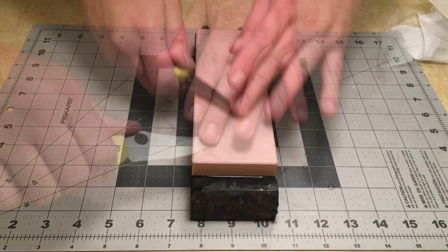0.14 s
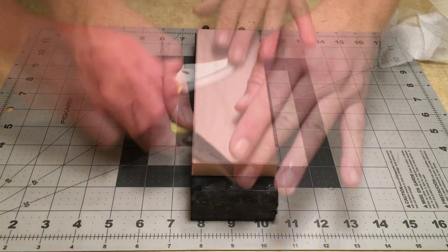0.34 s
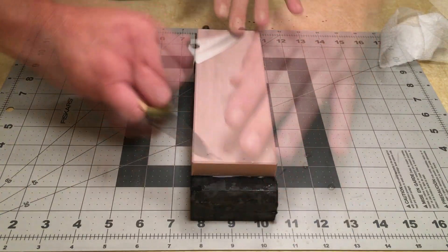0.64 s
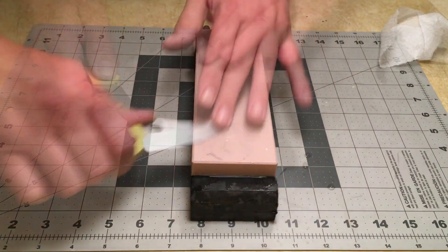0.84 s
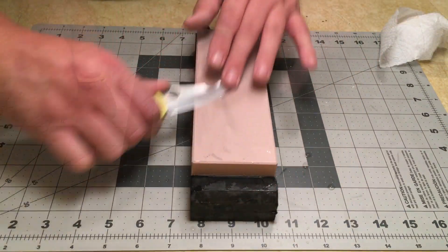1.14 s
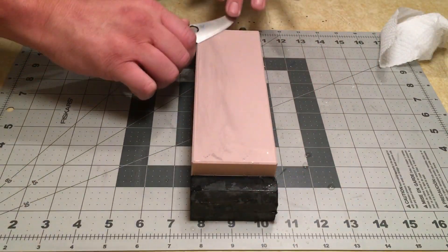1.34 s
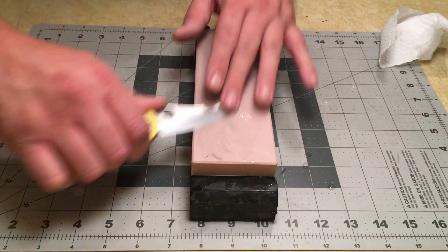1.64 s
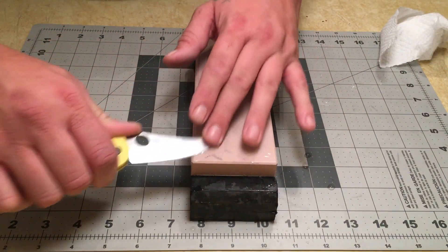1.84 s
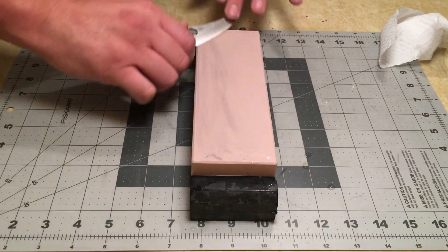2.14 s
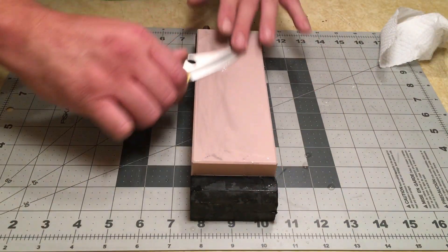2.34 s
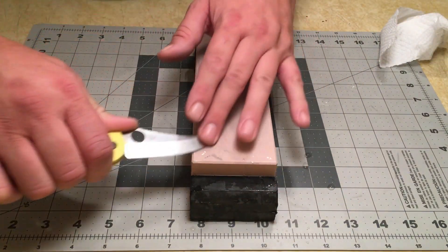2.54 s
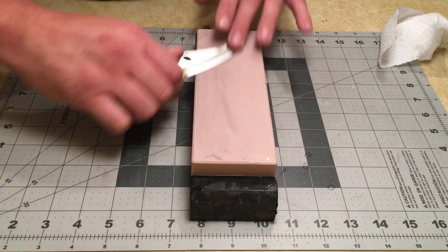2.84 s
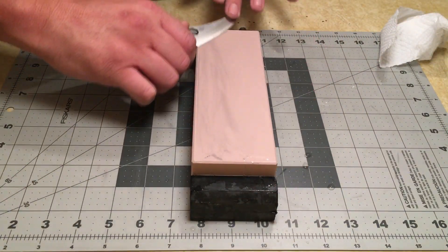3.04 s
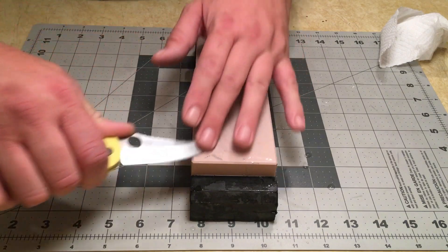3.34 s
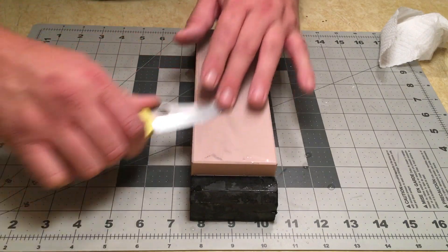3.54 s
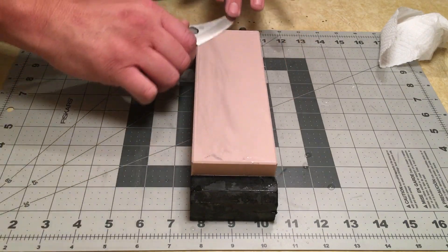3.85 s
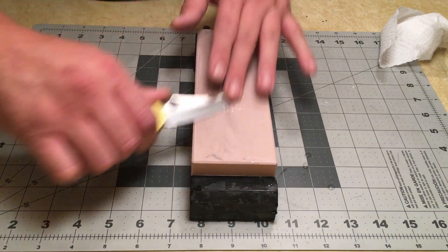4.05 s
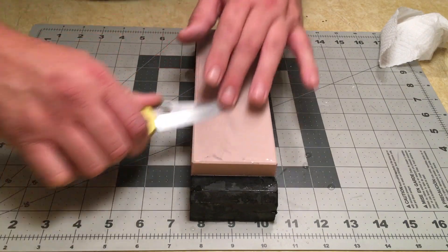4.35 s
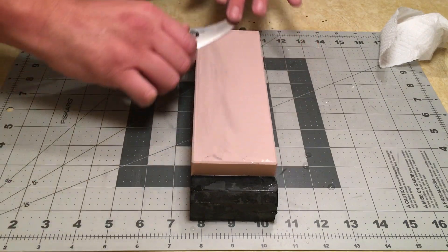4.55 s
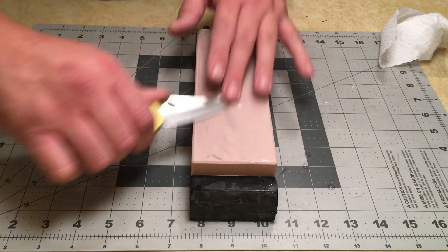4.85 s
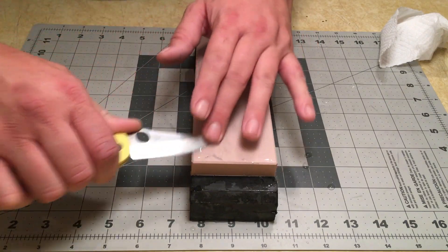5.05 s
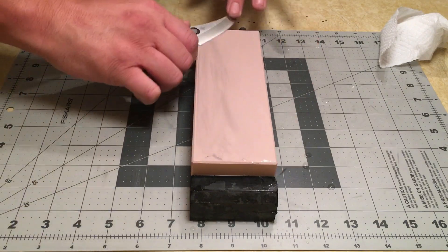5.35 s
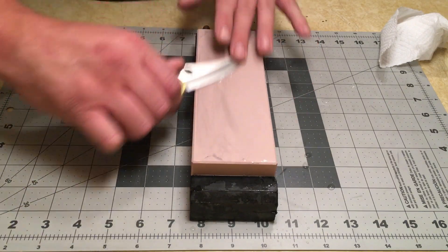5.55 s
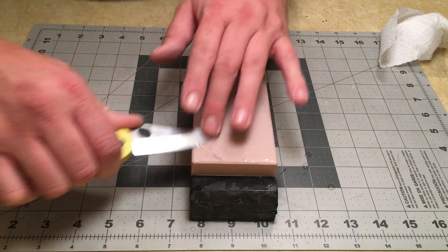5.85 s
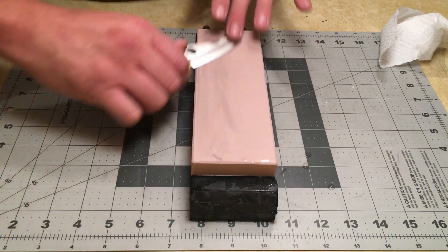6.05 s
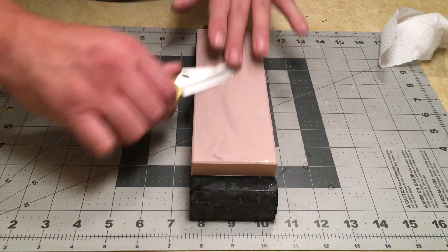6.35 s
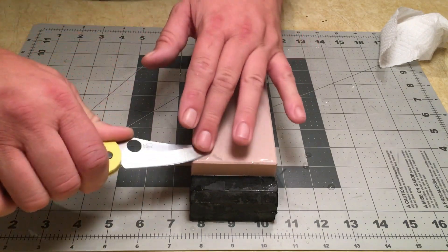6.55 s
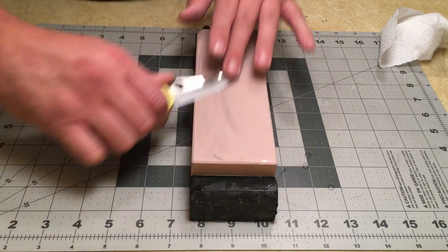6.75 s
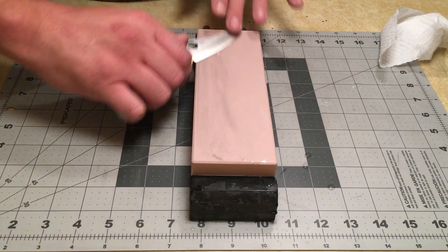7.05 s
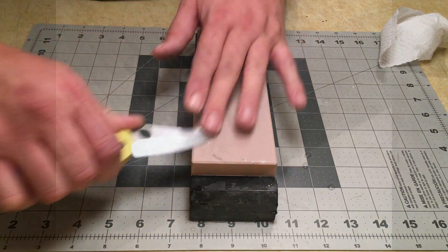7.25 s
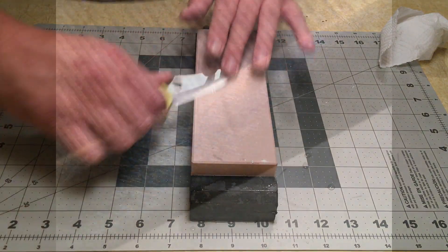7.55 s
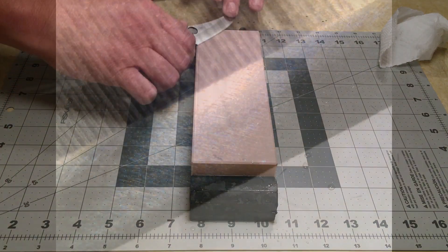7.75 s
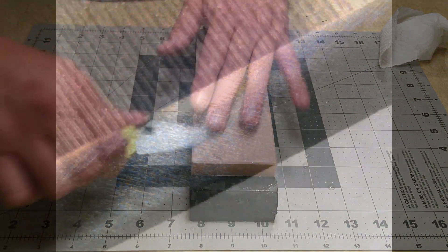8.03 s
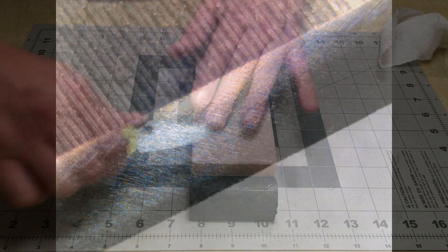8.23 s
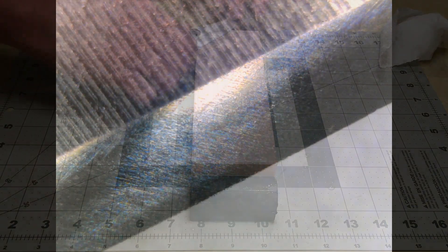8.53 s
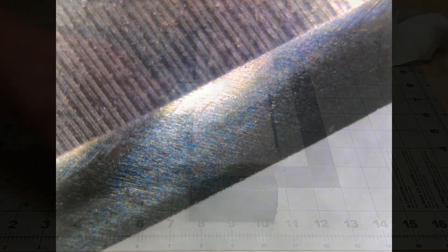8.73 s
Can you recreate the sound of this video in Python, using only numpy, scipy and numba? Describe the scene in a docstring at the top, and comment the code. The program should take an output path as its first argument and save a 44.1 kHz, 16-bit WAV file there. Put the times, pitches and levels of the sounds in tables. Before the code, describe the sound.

Light, hissing blade strokes with high metallic rings alternate on a sharpening stone, close up indoors, above a constant deep hum and soft air rush.

```python
"""Indoors, close to one microphone, a small folding knife is stroked back and forth on a fine wet stone.
Filtered noise bursts of grit drive the blade's modes, whose high rings climb as the contact slides to the tip;
the same kind of grit drives the lower modes of the stone. Taps, brushes and cracking grains are short bursts.
Two motors hum as sums of sines behind a soft rush of shaped noise; the sound stops dead during a stroke."""
import sys
import numpy as np
from scipy import signal
from scipy.fft import rfft, irfft
from scipy.io import wavfile
from scipy.ndimage import uniform_filter1d
from numba import njit

SR = 44100
rng = np.random.default_rng(int(sys.argv[2]) if len(sys.argv) > 2 else 0)


def volts_from_decibels(level):
    """Turn decibel levels (scalar or array-like) into linear amplitude factors."""
    exponent = np.asarray(level, float) / 20
    return 10 ** exponent


def dump(signal):
    """Clip the signal to [-1, 1] and save it as 16-bit WAV at the path in sys.argv[1]."""
    limited = np.clip(np.atleast_2d(signal).T, -1, 1)
    pcm = np.round(limited * 32767).astype(np.int16)
    wavfile.write(sys.argv[1], SR, pcm)


N = 392049
T = np.arange(N) / SR


def unit(x):
    """Normalization: scale to rms 1."""
    return x / np.sqrt(np.mean(x ** 2))


@njit
def svf(x, hz, width):
    """Resonance: a state-variable band-pass with a moving centre, gain 1 there."""
    y, b, l = np.empty(len(x)), 0., 0.
    for i in range(len(x)):
        g, k = np.tan(np.pi * hz[i] / SR), width[i] / hz[i]
        v = (b + g * (x[i] - l)) / (1 + g * (g + k))
        b, l, y[i] = 2 * v - b, l + 2 * g * v, k * v
    return y


def band(x, hz, width):
    """Cascaded resonance: two equal band-passes give a steep band, at rms 1."""
    hz, width = np.clip(hz + 0 * T, 50, .42 * SR), width + 0 * T
    return unit(svf(svf(x, hz, width), hz, width))


def colour(x, points):
    """Linear filtering: weight the spectrum by (f/Hz, level/dB) points."""
    hz, db = np.transpose(points)
    bin_hz = np.fft.rfftfreq(N, 1 / SR)
    gain_db = np.interp(np.log(bin_hz + 1), np.log(hz), db)
    return irfft(rfft(x) * volts_from_decibels(gain_db), N)


def walk(rate):
    """Slow random modulation: levels held 1 / rate s and smoothed twice, at rms 1."""
    k = int(SR / rate)
    held = np.repeat(rng.standard_normal(N // k + 1), k)
    return unit(uniform_filter1d(uniform_filter1d(held, k), k)[:N])


def grit():
    """Impulsive excitation: dense grains of abrasive, a few much larger than the rest."""
    grain_db = 2.2 * rng.exponential(1, N)
    return unit(rng.standard_normal(N) * volts_from_decibels(grain_db))


def knife():
    """Frictional excitation: the edge scrapes the stone, and blade and stone ring with the push."""
    edge_db, bright_db = hand()
    scrape = edge_scrape(edge_db, bright_db)
    rings = blade_rings(scrape)
    stone = volts_from_decibels(pressing(edge_db) - 3.0) * stone_ring()
    # pressure flutters quickly under the fingers and shakes everything alike
    return volts_from_decibels(1.2 * walk(60)) * (scrape + rings + stone)


# strokes, heel to tip first, then back, in turn:
# (hand turns t/s, relative edge hiss level/dB, relative brightness level/dB)
STROKE_TURNS = [(-.35, -60, -3.5), (.055, -61, 1), (.615, -64.5, 1.5), (1.045, -65.5, 1),
                (1.452, -63.5, 0.5), (1.875, -65.5, -2), (2.275, -64.5, 1), (2.67, -64, -1.5),
                (3.08, -62, 0.5), (3.49, -65, 1), (3.885, -64.5, 0.5), (4.29, -65.5, 0.5), (4.69, -63, 1.5),
                (5.08, -65, -2.5), (5.46, -62, -1.5), (5.85, -65, 0), (6.25, -61, -1), (6.65, -63.5, -2),
                (7.03, -63, -0.5), (7.43, -65, -0.5), (7.83, -61.5, -1), (8.25, -62, 0)]


def place():
    """Kinematics: stroke under way and contact point on the edge, 0 at the heel, 1 at the tip."""
    turns = np.transpose(STROKE_TURNS)[0]
    travel = np.interp(T, turns, np.arange(len(turns)))
    return travel.astype(int), 1 - np.abs(1 - travel % 2)


# what each stretch of the edge gives to every stroke:
# (place 0 heel - 1 tip, added hiss level/dB, added brightness level/dB)
EDGE_STRETCHES = [(0, 2.5, -8.5), (.15, -0.5, 2.5), (.33, -0.5, 3), (.55, 0, -0.5), (.7, -1, 2.5),
                  (1, -2, 2)]
# the edge bites harder for a moment:
# (t/s, half length to 1/e t/s, relative hiss level/dB, relative brightness level/dB)
EDGE_BITES = [(.22, 0.069, -56.5, -5.5), (.32, 0.063, -54, 1.5), (.57, .03, -66, -5),
              (.861, .03, -56.5, -8.5), (1.38, .03, -68.5, 8.5), (1.415, .025, -57, -1.5),
              (1.62, 0.023, -61, 9), (1.69, 0.046, -55.5, -0.5), (2.12, 0.039, -62, 3.5),
              (2.215, 0.037, -61, 0), (2.335, 0.062, -61.5, -4), (2.46, .03, -65.5, -4),
              (2.98, 0.036, -65, 8), (3.02, 0.027, -61.5, -8.5), (3.255, 0.034, -54.5, -7),
              (3.325, 0.027, -54, -4), (3.735, 0.053, -58.5, -1), (3.85, 0.022, -58, -6),
              (4.04, .025, -64, 6), (4.1, 0.058, -65, -3), (4.52, .035, -63.5, 2), (4.635, 0.04, -58.5, -2),
              (4.865, .035, -59.5, -5.5), (5.03, 0.039, -61, 2), (5.143, 0.034, -65.5, 10),
              (5.415, 0.027, -56.5, -7), (5.655, 0.027, -64.5, -10), (5.73, 0.016, -64, 5),
              (6.1, 0.038, -62, 1), (6.205, 0.021, -59, 0.5), (6.43, .04, -63.5, -8.5),
              (6.975, 0.023, -56.5, -7), (7.235, 0.079, -48, -3.5), (7.57, 0.055, -62.5, 3),
              (7.78, .03, -67.5, -0.5), (7.995, .035, -57.5, -9.5)]


def hand():
    """Addition of powers: hiss level and brightness from stroke, place and bites, hushed at the turns."""
    turns, hiss_db, bright_db = np.transpose(STROKE_TURNS)
    stroke, along = place()
    where, here_db, here_bright_db = np.transpose(EDGE_STRETCHES)
    stroke_db = uniform_filter1d(hiss_db[stroke], size=900)
    stroke_bright_db = uniform_filter1d(bright_db[stroke], size=900)
    edge = volts_from_decibels(stroke_db + np.interp(along, where, here_db)) ** 2
    tip = edge * volts_from_decibels(stroke_bright_db + np.interp(along, where, here_bright_db)) ** 2
    for s, half, db, bite_bright_db in EDGE_BITES:
        bite = volts_from_decibels(db) ** 2 * np.exp(-2 * ((T - s) / half) ** 2)
        edge = edge + bite
        tip = tip + bite * volts_from_decibels(bite_bright_db) ** 2
    # the hand halts at each turn: hiss lost there, time to regain speed
    turn_db, turn_s = -13, 0.02
    halt_db = sum(turn_db * np.exp(-np.abs(T - s) / turn_s) for s in turns)
    return 10 * np.log10(edge) + halt_db, 10 * np.log10(tip / edge)


# what the blade radiates best: (f/Hz, level/dB)
BLADE_RADIATION = [(3000, -6), (4000, -1.5), (5500, -2), (6900, 5.5), (7600, 1), (8800, -2.5), (9600, 0),
                   (10500, -0.5), (11600, 1.5), (13000, -1), (15700, -5)]


def edge_scrape(edge_db, bright_db):
    """Radiation: bands of grit noise at edge, tip and belly pass through the blade's response."""
    heel_hz, tip_hz = 8580, 9140  # mean ring of the edge as the hand turns at either end
    edge_hz = heel_hz + (tip_hz - heel_hz) * place()[1]
    edge_wander_hz = 180 * walk(20)
    edge = volts_from_decibels(edge_db - 1.5 + 2.0 * walk(36)) * band(grit(), edge_hz + edge_wander_hz, 2300)
    # patches of the edge catch and let go, each in its own stretch of the treble, sliding with the contact
    tip = np.zeros(N)
    for hz in [11100, 12260, 13320, 14500, 15400]:
        patch_hz = hz + 0.97 * (edge_hz - 8800)
        tip += volts_from_decibels(-11.0 + 2.7 * walk(32)) * band(grit(), patch_hz, 1600)
    belly = volts_from_decibels(0.72 * edge_db - 27.5 + 3.4 * walk(25)) * band(grit(), 5000, 6600)
    return colour(edge + volts_from_decibels(edge_db + bright_db) * tip + belly + sweeps(), BLADE_RADIATION)


# the curved belly rolls over the stone, the free length changes and its ring glides:
# (start t/s, length t/s, starting f/Hz, level before the blade's response/dB)
BELLY_GLIDES = [(0.734, 0.12, 4200, -62.5), (1.144, .2, 5200, -68.5), (1.58, 0.1, 4600, -54.5),
                (2.353, .14, 4500, -64.5), (3.168, .14, 4700, -58.5), (3.605, .15, 5200, -69),
                (3.997, .11, 4700, -60.5), (4.435, .12, 4680, -68.5), (4.778, .12, 4730, -59),
                (5.53, .14, 4600, -62.5), (6.037, .1, 4570, -67.5), (6.345, .095, 5070, -59.5),
                (7.132, .135, 5030, -53.5), (7.545, .13, 5200, -64), (7.88, .14, 4660, -62)]


def sweeps():
    """Time-varying resonance: a ring lingers, then glides away, over a broad scrape that trails it."""
    glide_out_hz, glide_back_hz = 9200, 3680  # end of the glide towards the tip and on the way back
    hz, push, wash = np.full(N, 5000.), np.zeros(N), np.zeros(N)
    stroke = place()[0]
    for s, length, from_hz, db in BELLY_GLIDES:
        to_hz = glide_back_hz if stroke[int(s * SR)] % 2 else glide_out_hz
        u = (T - s) / length
        on = (u > 0) & (u < 1)
        hz[on] = from_hz * (to_hz / from_hz) ** u[on] ** 2.1
        push[on] = volts_from_decibels(db) * np.sin(np.pi * u[on] ** 0.79) ** 1.4
        wash += volts_from_decibels(db - 4.0) * np.exp(-((u - .75) / 0.5) ** 2)
    ring = push * volts_from_decibels(0.26 * walk(42)) * band(grit(), hz, .26 * hz)
    return ring + wash * band(grit(), 4800, 4000)


# the blade's sharper rings: (f/Hz, width f/Hz, mean level/dB)
BLADE_RINGS = [(3950, 210, 0), (4700, 110, -4), (5200, 28, 6.5), (5730, 110, -2), (8290, 160, -1.5),
               (9040, 67, -1), (9570, 120, -2.5), (11780, 500, 1.5), (13000, 450, -3.5), (13500, 590, -3),
               (14500, 500, -4.5)]


def blade_rings(scrape):
    """Modal resonance: the scrape drives the blade's modes, and the highest follow the contact."""
    sliding_hz, slide = 10000, 0.041  # rings above this climb by this share from heel to tip
    slid = 1 + slide * (place()[1] - .3) + .012 * walk(16)
    rings = np.zeros(N)
    for hz, width, db in BLADE_RINGS:
        ratio = slid if hz > sliding_hz else 1 + 0 * T
        flicker_db = 2.5 * walk(22)
        rings += volts_from_decibels(db + flicker_db) * svf(scrape, hz * ratio, width + 0 * T)
    return rings


# the stone rings as the belly presses on it: (peak t/s, rise t/s, relative peak level/dB)
STONE_PRESSES = [(.855, 0.039, -56.5), (1.19, 0.092, -62), (1.7, 0.043, -53.5), (1.985, 0.027, -58),
                 (2.47, 0.068, -58), (2.8, .02, -58), (3.275, .05, -55), (3.635, 0.028, -62),
                 (4.11, 0.053, -55.5), (4.425, 0.029, -58), (4.89, 0.035, -57.5), (4.97, .02, -64),
                 (5.23, 0.068, -64), (5.655, 0.032, -54.5), (5.995, .03, -54), (6.44, 0.07, -55.5),
                 (6.795, 0.037, -60.5), (6.89, 0.017, -59), (6.95, .015, -64), (7.25, 0.054, -54),
                 (7.39, .015, -69.5), (7.58, 0.066, -65), (8.03, 0.058, -54.5)]


def pressing(edge_db):
    """Addition of powers: relative level in dB of the stone under the hiss and each press."""
    power = volts_from_decibels(edge_db - 10) ** 2  # the stone follows the hiss faintly all along
    for s, rise, db in STONE_PRESSES:
        # the press lets go more slowly than it comes
        spread = np.where(T < s, rise, 1.4 * rise)
        power = power + volts_from_decibels(db) ** 2 * np.exp(-2 * ((T - s) / spread) ** 2)
    return 10 * np.log10(power)


# modes of the stone: (f/Hz, width of each filter f/Hz, relative level/dB)
STONE_RINGS = [(1993, 220, -4.5), (2129, 110, -1), (2223, 147, -4), (2346, 160, -12.5), (1348, 1200, -1.5)]


def stone_ring():
    """Modal superposition: one grit force drives every mode of the stone."""
    force = grit()
    return sum(volts_from_decibels(db + 1.0 * walk(40)) * band(force, hz, width) for hz, width, db in STONE_RINGS)


# the handle taps the stone holder: (t/s, level at the start of the decay/dB)
HANDLE_TAPS = [(5.4134, -36.5), (6.21, -34)]
# a loose grain cracks under the edge: (t/s, rms level at the peak/dB)
GRAIN_TICKS = [(1.713, -55), (5.42, -54), (5.72, -55), (6.215, -58)]


def taps():
    """Damped oscillation: each tap rings one dull mode; each grain is a thin burst of treble."""
    tap_hz, tap_t60_s, tick_s = 500, .017, .005
    start, db = np.transpose(HANDLE_TAPS)
    t = np.clip(T - start[:, None], 0, None)
    decay = np.exp(-np.log(1000) * t / tap_t60_s)
    dull = volts_from_decibels(db) @ (np.sin(2 * np.pi * tap_hz * t) * decay)
    thin = sum(volts_from_decibels(db) * np.exp(-((T - s) / tick_s) ** 2) for s, db in GRAIN_TICKS)
    return dull + thin * band(grit(), 10500, 9000)


# soft brushes of hand or handle:
# (start t/s, rms level at the peak/dB, ring f/Hz, width of each filter f/Hz, rise t/s)
SOFT_KNOCKS = [(.39, -51, 135, 50, .02), (.44, -58.5, 1680, 500, 0.039), (5.408, -52.5, 500, 330, 0.0098),
               (6.203, -57, 520, 380, 0.0064)]


def knocks():
    """Transient excitation: each dull brush is a noise burst through a resonance."""
    out = np.zeros(N)
    for s, db, hz, width, rise in SOFT_KNOCKS:
        t = np.clip(T - s, 0, None) / rise
        out += volts_from_decibels(db) * t * np.exp(1 - t) * band(rng.standard_normal(N), hz, width)
    return out


# tones of the fan: (multiple of the fan turn, rms level/dB); the first also follows LOWEST_TONE_LEVEL
FAN_TONES = [(1, -46), (3, -70), (7, -60), (8, -80), (10, -79), (11, -78), (13, -71.5), (14, -80),
             (19, -76), (47, -87), (48, -88), (50, -87.5), (52, -78.5)]
# tones of the compressor: (multiple of the magnetic buzz, multiple of the shaft turn, rms level/dB)
COMPRESSOR_TONES = [(0, 1, -59), (0, 3, -72), (0, 4, -64.5), (0, 5, -73), (0, 7, -69), (0, 8, -65),
                    (0, 19, -81), (1, 1, -65), (2, 0, -72.5), (2, 1, -69.5), (1, 4, -71.5), (1, 5, -66.5),
                    (3, 2, -71.5), (1, 7, -77), (4, 3, -78), (3, 7, -75), (3, 8, -78.5), (5, 8, -79.5),
                    (6, 8, -79), (6, 10, -81)]
# further steady tones: (f/Hz, rms level/dB)
DRONE_TONES = [(109.8, -56.5), (2100.1, -80)]
# level of the fan's lowest tone, with a quick rise near 0.45 s: (t/s, added level/dB)
LOWEST_TONE_LEVEL = [(0, -1.5), (.4, -1), (.445, -1), (.5, 1.5), (4, 0), (8.1, -1)]


def motors():
    """Fourier synthesis: sines at multiples of the fan turn and at sums of shaft turn and magnetic buzz."""
    fan_hz, shaft_hz, buzz_hz = 58.9, 49.25, 120.
    tones = [(k * fan_hz, db) for k, db in FAN_TONES]
    tones += [(m * buzz_hz + k * shaft_hz, db) for m, k, db in COMPRESSOR_TONES]
    tones += DRONE_TONES
    drift = 0.00017 * walk(.7)  # seconds gained or lost as the speed wanders
    waves = []
    for hz, db in tones:
        cycles = hz * (T + drift) + rng.random()
        waves.append(np.sqrt(2) * volts_from_decibels(db) * np.sin(2 * np.pi * cycles))
    lowest_gain = volts_from_decibels(np.interp(T, *np.transpose(LOWEST_TONE_LEVEL)))
    return sum(waves[1:]) + waves[0] * lowest_gain


# rushing air and microphone hiss, lower and upper range: (f/Hz, level per Hz/dB)
AIR_LOW_SPECTRUM = [(20, -99.5), (42, -77.5), (92, -75.5), (107, -71), (116, -72), (128, -70), (150, -81),
                    (180, -74.5), (235, -82.5), (290, -78.5), (350, -77), (480, -89), (640, -86.5),
                    (900, -92.5)]
AIR_HIGH_SPECTRUM = [(1150, -89), (1500, -93), (1850, -95.5), (2120, -97), (2600, -102), (3300, -101),
                     (4200, -105), (5400, -108), (6500, -103), (7400, -112), (8500, -109), (10500, -114),
                     (12500, -111), (15500, -115)]


def air():
    """Spectral density: smooth noise shaped by the room."""
    # the factor makes white noise 0 dB per Hz
    return colour(rng.standard_normal(N), AIR_LOW_SPECTRUM + AIR_HIGH_SPECTRUM) * np.sqrt(SR / 2)


def scene():
    """Superposition: all sources add at one microphone, which feeds both channels."""
    return np.tile(knife() + knocks() + taps() + motors() + air(), (2, 1))


def band_limit(x):
    """A steep low-pass at the top of the band."""
    return signal.sosfilt(signal.butter(12, 15720, fs=SR, output="sos"), x)


def record(dry):
    """Time gating: the sound is cut off sharply."""
    stop_s = 8.079
    mix = dry * (T < stop_s)
    return band_limit(mix)


dry = scene()
out = record(dry)
dump(out)
```